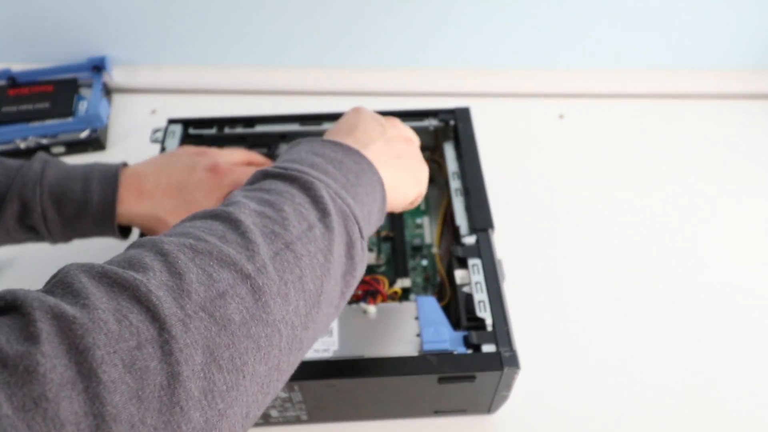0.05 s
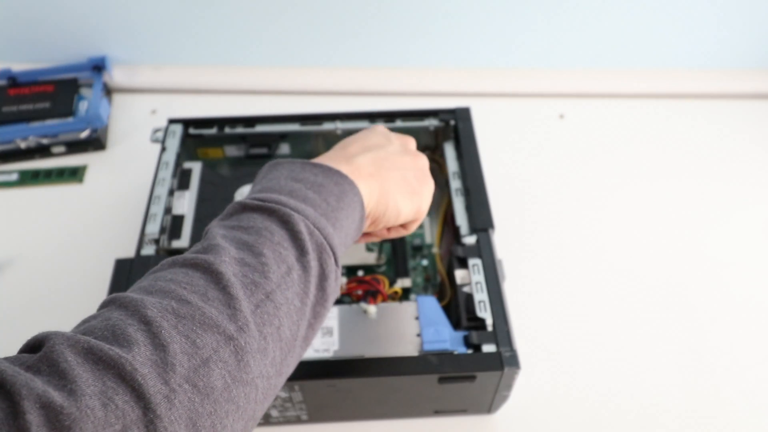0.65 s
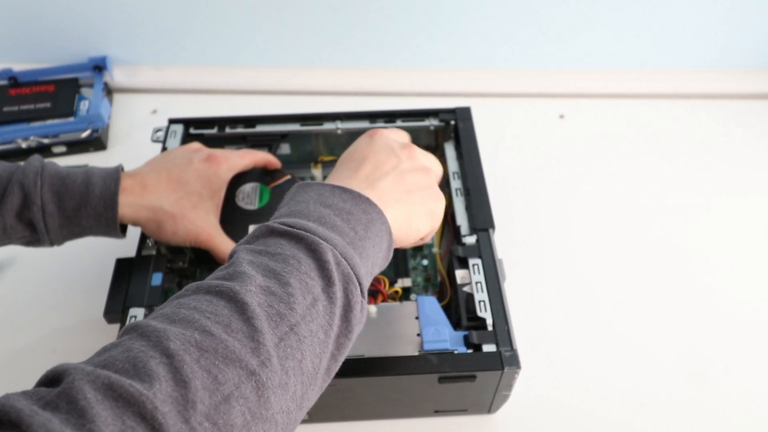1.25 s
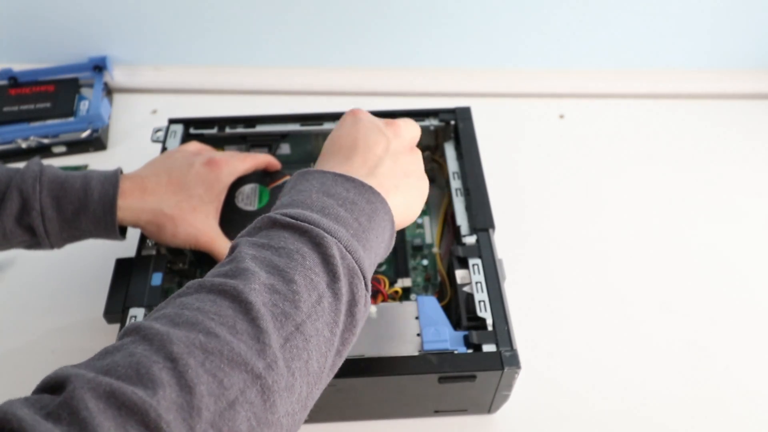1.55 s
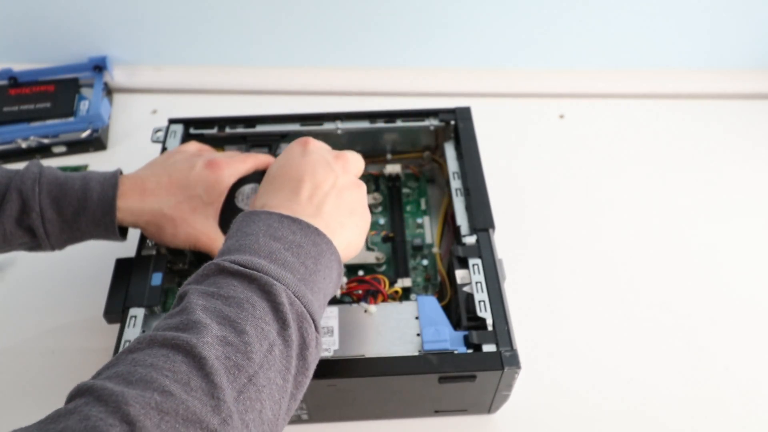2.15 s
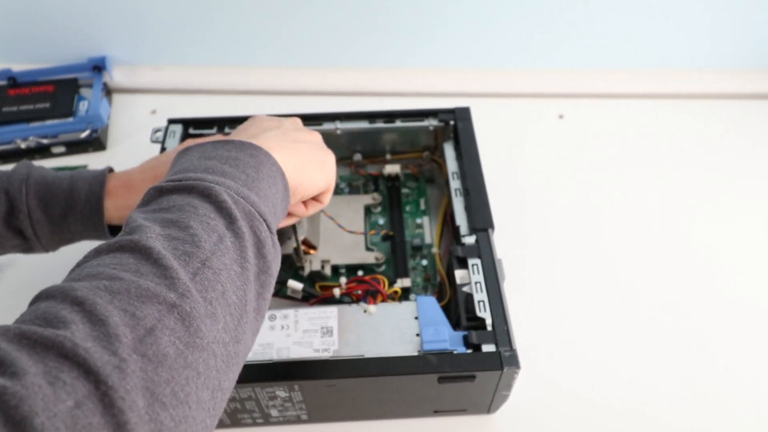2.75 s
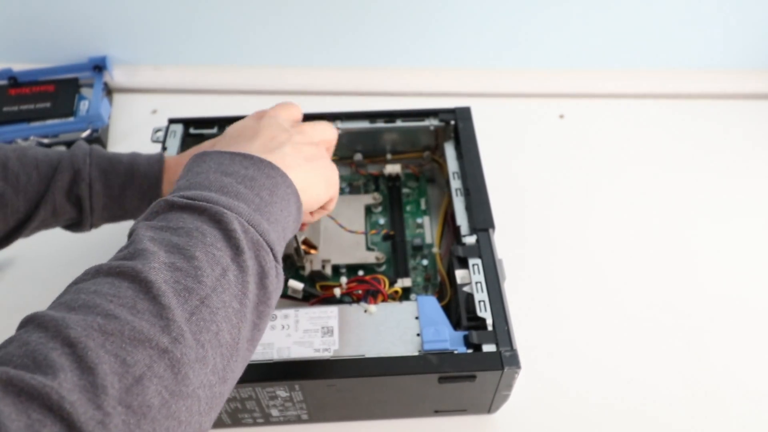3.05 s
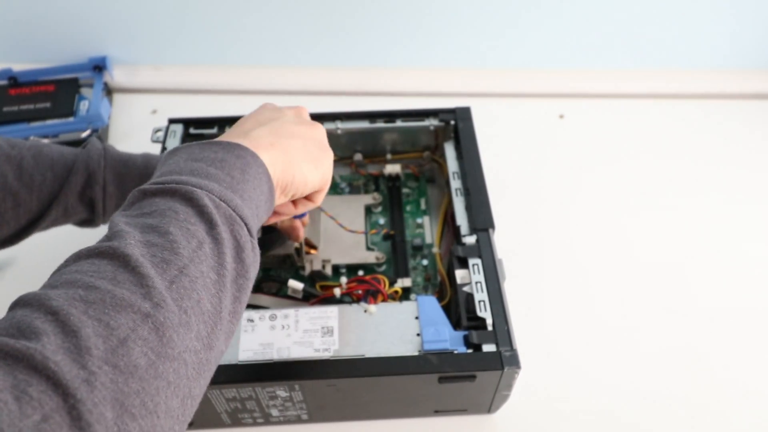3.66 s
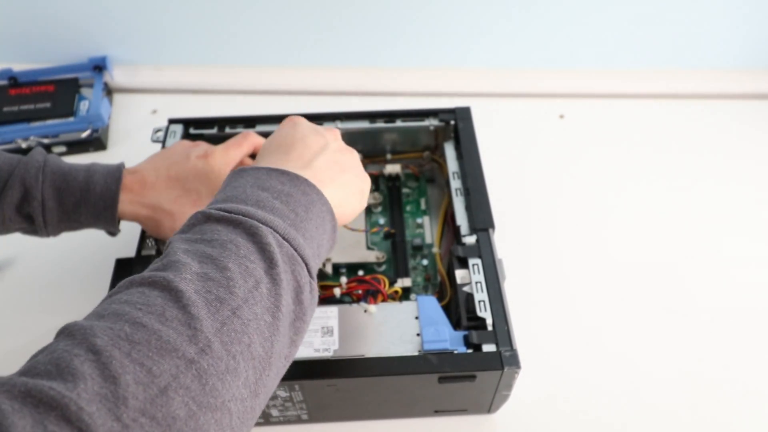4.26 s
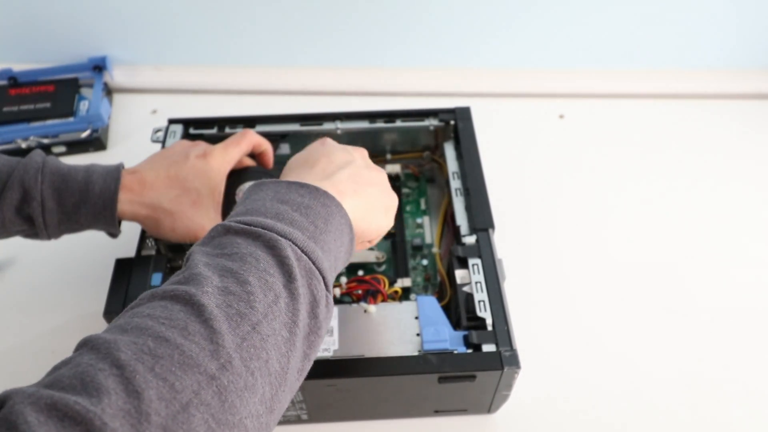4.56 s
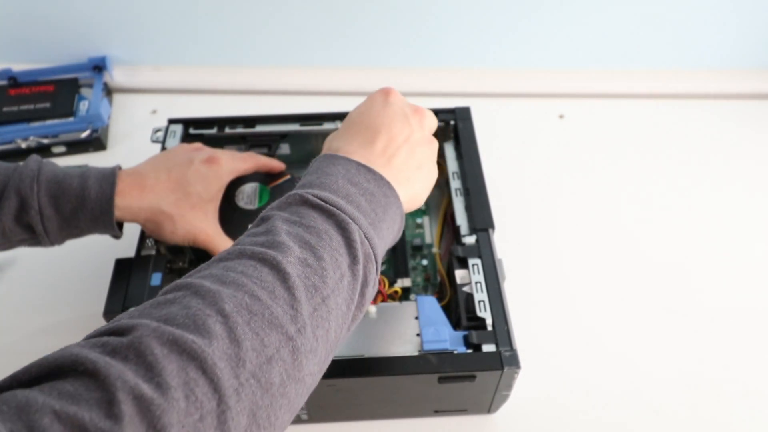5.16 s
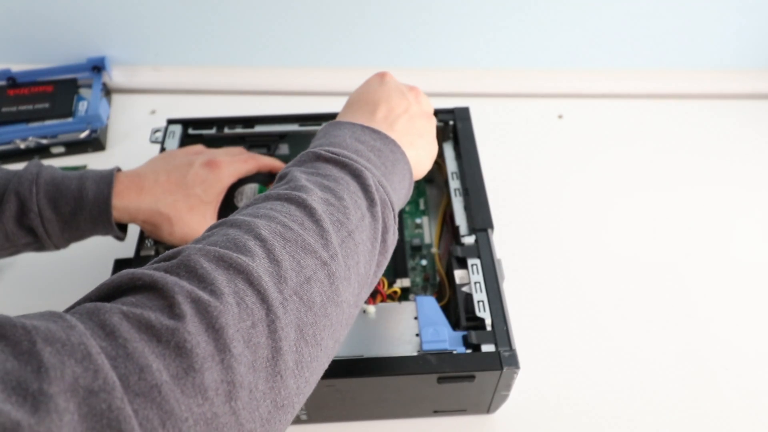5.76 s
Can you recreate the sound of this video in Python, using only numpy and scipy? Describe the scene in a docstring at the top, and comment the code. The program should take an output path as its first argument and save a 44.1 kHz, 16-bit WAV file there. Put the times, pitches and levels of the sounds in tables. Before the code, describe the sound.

A screwdriver works at the cooler screws inside an open desktop computer. Irregular sharp metal clicks and knocks briefly ring the board and steel case, with gritty scrapes and a few faint, thin squeaks between them. After a quieter stretch of light ticks, a loud snap and a short spring twang come near the end. The sound is close, in a small room with soft air and a low hum.

```python
"""A screwdriver knocks and slips in the cooler screws of an open desktop computer, in a small room. Each knock
is a metal crack and a short chatter that rings the board and the steel case. Sprung screws snap free and the
spring twangs; the hardest knocks set the board swinging. Between the knocks, threads and tool stick and slip in
gritty scrapes and thin squeaks, and the tool ticks faintly in the hand. Two close microphones hear it all with
the room's reflections, over soft air and a low mains hum."""
import sys
import numpy as np
from scipy import signal
from scipy.fft import rfft, irfft
from scipy.io import wavfile
from scipy.ndimage import uniform_filter1d

SR = 44100
rng = np.random.default_rng(int(sys.argv[2]) if len(sys.argv) > 2 else 0)


def output_pcm(signal):
    """Save a mono or channel-first signal as 16-bit PCM at the path in sys.argv[1].

    Samples are clipped to [-1, 1] before scaling.
    """
    pcm = np.clip(np.atleast_2d(signal).T, -1, 1) * 32767
    wavfile.write(sys.argv[1], SR, np.round(pcm).astype(np.int16))


N = 255780
FREQ = np.fft.rfftfreq(N, 1 / SR)
TIME = np.arange(N) / SR

# tool or screw hits the case (time [s], level [dB], brightness [dB], contact time [s],
# ring of the struck spot [Hz], ring level [dB]); brightness and ring are relative to the hit
KNOCK_HITS = [(0.006, -42, -13, 0.00096, 1530, -14), (0.127, -41, -10, 0.0033, 2330, 4),
              (0.32, -48, 1.5, 0.00079, 2640, -1), (0.331, -35, -11.5, 0.0009, 2890, -2.5),
              (0.375, -36.5, -17.5, 0.0008, 1500, -6), (0.559, -51.5, -9, 0.0013, 2650, -6),
              (0.823, -37, -11.5, 0.0035, 2720, -11), (0.953, -28.5, -13, 0.0052, 718, -3.5),
              (1.047, -55, -28, 0.0014, 1470, 10), (1.107, -28.5, -19.5, 0.0018, 1140, -28),
              (1.253, -36.5, -16, 0.0074, 1100, 0), (1.2806, -23, -1.5, 0.0024, 1530, -31),
              (1.4368, -22, -9.5, 0.003, 796, -7.5), (1.517, -37, -8, 0.003, 1450, 0),
              (1.69, -54.5, -30, 0.001, 640, 12), (2.2436, -17.5, -4.5, 0.0016, 1734, -1),
              (2.271, -28, -8.5, 0.0008, 561, 4), (2.459, -45.5, -19, 0.00047, 520, -0.5),
              (2.611, -40, -13, 0.0015, 1510, -16), (2.767, -25.5, 7.5, 0.00022, 650, -3.5),
              (2.904, -29.5, -7.5, 0.0012, 1640, -6), (2.955, -38, -22, 0.002, 1420, -22),
              (3.058, -40.5, -11, 0.0015, 2600, -7.5), (3.1308, -30, -15, 0.00043, 810, -5),
              (3.1625, -22.5, 6, 0.0023, 3010, -3), (3.254, -30.5, -22.5, 0.00091, 1455, -13),
              (3.477, -35.5, -32, 0.00046, 1210, -4), (3.64, -27.5, -28.5, 0.002, 1270, -17),
              (3.661, -52, 3.5, 0.0018, 7100, 5.5), (4.064, -42.5, -5.5, 0.0041, 1170, 1.5),
              (4.417, -61.5, -4, 0.0023, 3350, 1), (4.661, -41.5, 3, 0.0039, 696, 3),
              (5.205, -66, 15, 0.00085, 8000, -10), (5.222, -47, -31, 0.0022, 765, 12),
              (5.2345, -18.5, -1.5, 0.0047, 736, -5.5), (5.4946, -26.5, 1.5, 0.0034, 1920, -6),
              (5.609, -37, -3, 0.0011, 1510, -2.5)]
# bands of a contact sound, thud to sizzle (centre [Hz])
CONTACT_BANDS = [260, 670, 1500, 3150, 6700, 12600]
# decay of a knock's chatter (frequency [Hz], t60 [s])
CHATTER_DECAY = [(250, 0.43), (700, 0.14), (1500, 0.075), (3200, 0.06), (7000, 0.058), (13000, 0.042)]
# resonances of board, case and tool (frequency [Hz], width [Hz], level against the bare contact [dB])
CASE_MODES = [(470, 7.5, -56), (536, 41, 3), (650, 87, -6), (794, 23, 14.5), (962, 80, 4.5), (1115, 13, 11),
              (1277, 240, 6.5), (1440, 140, 3), (1502, 170, -0.5), (1725, 23, -3), (2120, 53, -23),
              (2460, 57, 17), (2666, 134, 19.5), (2908, 270, 13.5), (3230, 61, -3), (3430, 120, 5),
              (4070, 27, 4.5), (6950, 370, -42), (8700, 250, -6)]
# the spring under a screw head lets go (time [s], level [dB])
SPRING_TWANGS = [(5.497, -20.5), (5.579, -33.5), (5.61, -40)]
# ring of that spring (frequency [Hz], relative level [dB], t60 [s])
SPRING_MODES = [(1758, -3.5, 0.12), (1870, -8, 0.16), (2260, 2.5, 0.04), (3580, -9.5, 0.12),
                (4210, 6.5, 0.046)]
# a hard knock sets the board swinging (time [s], level [dB], tilt of its modes [dB/octave])
BOARD_SWINGS = [(2.246, -27.5, 5), (2.772, -29.5, 10), (5.238, -22.5, -6.5)]
# ring of the board (frequency [Hz], relative level [dB], t60 [s])
BOARD_MODES = [(167, -5.5, 0.091), (360.7, 1.5, 0.15), (478.6, -6, 0.46), (493, -5, 0.069), (568, -8, 0.17),
               (609, -5.5, 0.29), (750, -11, 0.072)]
# screw turns, tool slides, rattles (peak time [s], half length [s], level [dB], rubbed spot's ring [Hz])
SCRAPE_STROKES = [(0.078, 0.029, -43.5, 1670), (0.151, 0.011, -34.5, 2580), (0.172, 0.013, -30, 2300),
                  (0.305, 0.055, -56, 7840), (0.779, 0.046, -43.5, 865), (0.886, 0.021, -37.5, 990),
                  (0.955, 0.005, -35, 603), (1.189, 0.035, -41, 1240), (1.336, 0.011, -38.5, 1840),
                  (1.492, 0.035, -35.5, 884), (2.266, 0.0052, -29.5, 530), (2.803, 0.03, -31.5, 1210),
                  (2.862, 0.012, -36, 626), (3.088, 0.015, -43, 1550), (3.2, 0.02, -39, 600),
                  (3.39, 0.02, -40, 1560), (3.534, 0.066, -51.5, 1190), (3.69, 0.03, -48, 1180),
                  (3.777, 0.032, -40, 1190), (3.973, 0.011, -43.5, 1110), (4.014, 0.017, -45, 1140),
                  (4.324, 0.022, -50, 3320), (4.421, 0.13, -60.5, 1150), (4.699, 0.02, -41.5, 1144),
                  (4.925, 0.019, -55, 840), (5.28, 0.028, -35.5, 417), (5.554, 0.03, -39, 1730),
                  (5.582, 0.014, -39, 3580), (5.709, 0.03, -45.5, 1620)]
# a turning screw sings (time [s], length [s], top pitch [Hz], level [dB])
THREAD_SQUEAKS = [(0.155, 0.035, 12900, -45), (0.16, 0.035, 6700, -43), (1.852, 0.06, 12450, -60),
                  (1.905, 0.06, 11050, -68), (1.975, 0.082, 10950, -64), (2.51, 0.08, 11250, -63)]
# stereo image of the direct sound (frequency [Hz], left-right likeness [0-1])
DIRECT_LIKENESS = [(200, 1), (1000, 0.87), (3000, 0.61), (14000, 0.1)]
# stereo image of reverb and air (frequency [Hz], left-right likeness [0-1])
DIFFUSE_LIKENESS = [(30, 0.88), (400, 0.87), (1500, 0.19), (5000, 0.05), (15000, 0.1)]
# reverb time (frequency [Hz], t60 [s])
REVERB_DECAY = [(200, 0.29), (700, 0.39), (2000, 0.51), (7000, 0.36), (14000, 0.28)]
# reverb send (frequency [Hz], gain [dB])
REVERB_SEND = [(200, -4.5), (700, -4), (2000, -8.5), (7000, -8.5), (14000, -11.5)]
# colour of the room air (frequency [Hz], relative level [dB])
AIR_SPECTRUM = [(12, -42), (20, -10.5), (58, -9.5), (91, -10.5), (124, -7.5), (206, -15.5), (237, -6),
                (323, -4), (361, -2), (465, -14), (551, -13.5), (2010, -30.5), (12100, -33.5), (15200, -31),
                (16500, -64)]
# partials of the mains hum (frequency [Hz], level [dB])
HUM_PARTIALS = [(59.5, -62), (119.7, -59.5), (240, -59.5), (300, -60.5), (360, -57)]
# colour of the microphones (frequency [Hz], gain [dB])
MIC_EQ = [(100, 1), (2000, 0), (3300, 2.5), (4200, -5), (4800, -5.5), (5400, -2), (6400, 2.5), (9000, -0.5),
          (11500, 0), (13500, -4), (15000, -8.5), (16200, -15)]


def knocks(hits, ring_q=18, ring_feed_t60=0.022, crack_s=0.0022):
    """Metal cracks on metal and chatters briefly; the treble dies first and the struck spot rings."""
    out, t = np.zeros((2, N)), np.arange(8192) / SR
    for s, db, bright_db, contact_s, spot_hz, spot_db in hits:
        onset = 1 - np.exp(-(t / (0.4 * contact_s)) ** 2)
        after = np.maximum(t - contact_s, 0)
        # a harder hit has more crack up front and less body
        crack = 1 + amp(4 + 0.54 * (db + 6)) * np.exp(-(after / crack_s) ** 2)
        body_db = -4 - 0.2629 * (db + 36.5)
        # a longer contact pushes more bass into the case and dulls the top octave
        thud_db = -20 + 9 * np.log2(contact_s / 0.0026)
        top_db = -8 - 2 * np.log2(contact_s / 0.0035)
        gains = contact_eq(thud_db, body_db, bright_db, top_db)
        chatter = rng.standard_normal(len(t)) * onset * crack
        decays = [amp(-60 * after / curve(CHATTER_DECAY, hz)) for hz in CONTACT_BANDS]
        clack = sum(gain * unit_hit(band(chatter * decays[k], k)) for k, gain in enumerate(gains))
        # the chatter keeps feeding the spot, so its ring is rough
        feed = chatter * amp(-60 * after / ring_feed_t60)
        ring = unit_hit(signal.lfilter(*signal.iirpeak(spot_hz, ring_q, SR), feed))
        right_db = 1.05 + 0.5 * np.log2(spot_hz / 1200)  # higher-ringing spots lie further right
        add(out, s, amp(db - 1) * (clack + amp(spot_db - 1) * ring) * pan(right_db))
    return out


def case_ring(x):
    """The modes of board and case gather the energy of each contact into narrow peaks."""
    response = 1 + sum(amp(db) / (1 + 2j * (FREQ - hz) / width) for hz, width, db in CASE_MODES)
    broad_gain = np.sqrt(uniform_filter1d(abs(response) ** 2, size=5000))
    return irfft(rfft(x) * response / broad_gain, N)


def spring_and_board(spring_rise_s=0.00031, board_rise_s=0.011):
    """A freed spring twangs at once; after a hard knock the heavier board takes a few cycles to swing."""
    out, t = np.zeros((1, N)), np.arange(16384) / SR
    for s, db in SPRING_TWANGS:
        twang = modal_ring(SPRING_MODES, t) * (1 - np.exp(-t / spring_rise_s))
        add(out, s, amp(db) * twang[None])
    for s, db, tilt in BOARD_SWINGS:
        swing = modal_ring(BOARD_MODES, t, tilt) * (1 - np.exp(-t / board_rise_s))
        add(out, s, amp(db) * swing[None])
    return out


def modal_ring(modes, t, db_per_octave=0):
    """A struck part rings as decaying sines of random phase."""
    ring = np.zeros(len(t))
    for hz, db, t60 in modes:
        tilt_db = db_per_octave * np.log2(hz / modes[0][0])
        ring += amp(db + tilt_db - 60 * t / t60) * np.sin(2 * np.pi * (hz * t + rng.random()))
    return unit_hit(ring)


def scrapes(slips_per_s=2600, slip_s=0.0007, ring_db=-4, ring_q=16):
    """Threads and tool stick and slip: a swell of tiny uneven clicks rings the rubbed spot."""
    out, t = np.zeros((2, N)), np.arange(24000) / SR
    for peak_s, half_s, db, spot_hz in SCRAPE_STROKES:
        slipping = rng.random(len(t)) < slips_per_s / SR
        slip_db = 3 * np.minimum(rng.exponential(1, len(t)), 4)
        slips = signal.lfilter([1], [1, -np.exp(-1 / (slip_s * SR))], slipping * amp(slip_db))
        swell = np.exp(-((t - 2 * half_s) / half_s) ** 2 / 2) * np.minimum(2 * t / half_s, 1)
        grit = swell * slips * rng.standard_normal(len(t))
        bright_db = -13 + 4 * np.log2(spot_hz / 1200)  # a higher-ringing spot rubs brighter
        gains = contact_eq(thud_db=-14, body_db=-3, bright_db=bright_db, top_db=-1)
        rub = sum(gain * unit_rms(band(grit, k)) for k, gain in enumerate(gains))
        ring = amp(ring_db) * unit_rms(signal.lfilter(*signal.iirpeak(spot_hz, ring_q, SR), grit))
        level = amp(db - 2) * np.sqrt(np.mean(swell ** 2))
        add(out, peak_s - 2 * half_s, level * (rub + ring) * pan(right_db=1.5))
    return out


def squeaks(sag=0.12, crest=0.35, jitter_depth=0.0044):
    """The thread slips fast enough to sing: a thin, shaky tone that crests, then sags as the turn slows."""
    out = np.zeros((1, N))
    for s, length_s, top_hz, db in THREAD_SQUEAKS:
        jitter = unit_rms(uniform_filter1d(rng.standard_normal(8192), size=60))
        turn = np.arange(int(length_s * SR)) / (length_s * SR)
        hz = top_hz * (1 - sag * (turn - crest) ** 2 + jitter_depth * jitter[:len(turn)])
        tone = np.sin(2 * np.pi * np.cumsum(hz) / SR)
        add(out, s, amp(db) * np.sin(np.pi * turn) * tone[None])
    return out


def tool_ticks(count=8, db=-58, spread_db=10, bright_db=-8, contact_s=0.0012, spot_hz=2120):
    """Faint extra hits at random moments, as the tool shifts in the hand."""
    return [(when * N / SR, db + spread_db * (2 * force - 1), bright_db, contact_s,
             spot_hz * 2 ** (spot - 0.5), 0) for when, force, spot in rng.random((count, 3))]


def close_mics(x, lag_s=0.000019, scatter_s=0.0015):
    """Two close microphones: the case reaches the left slightly earlier, and near reflections differ."""
    scatter = rfft(rng.standard_normal(N) * TIME * np.exp(-TIME / scatter_s))
    scatter /= np.sqrt(np.mean(abs(scatter) ** 2))
    likeness = curve(DIRECT_LIKENESS, FREQ)
    side = np.array([[1], [-1]])
    paths = np.sqrt((1 + likeness) / 2) + side * np.sqrt((1 - likeness) / 2) * scatter
    return irfft(rfft(x) * paths * np.exp(1j * np.pi * side * FREQ * lag_s), N)


def room_reverb(x, first_wall_s=0.013):
    """Dense reflections build up after the first wall and die band by band."""
    hz, t, noise = signal.stft(rng.standard_normal((2, 32768)), SR, nperseg=256)
    hz = hz[:, None]
    t60 = curve(REVERB_DECAY, hz)
    decay = amp(-60 * t / t60) * np.sqrt(np.log(1e6) / (t60 * SR))  # equal energy at any t60
    tail = signal.istft(diffuse(noise, hz) * amp(curve(REVERB_SEND, hz)) * decay, SR, nperseg=256)[1]
    tail *= 1 - np.exp(-(TIME[:tail.shape[1]] / first_wall_s) ** 4)
    return signal.fftconvolve(x, tail, axes=1)[:, :N]


def room_air(db=-48):
    """A steady bed of dark, diffuse noise."""
    noise = diffuse(rfft(rng.standard_normal((2, N))), FREQ)
    return amp(db) * unit_rms(irfft(noise * amp(curve(AIR_SPECTRUM, FREQ)), N))


def mains_hum(waver=0.63, drift_hz=6):
    """A low mains hum, each partial wavering in level and phase."""
    hum = np.zeros(N)
    for hz, db in HUM_PARTIALS:
        slow_noise = rfft(rng.standard_normal((2, N))) * np.exp(-(FREQ / drift_hz) ** 2)
        level_drift, phase_drift = waver * unit_rms(irfft(slow_noise, N))
        hum += amp(db) * unit_rms((1 + level_drift) * np.sin(2 * np.pi * hz * TIME + phase_drift))
    return hum


def diffuse(spectra, hz):
    """Blends two unrelated spectra until they are as alike as room sound at the two microphones."""
    likeness = curve(DIFFUSE_LIKENESS, hz)
    return np.array([spectra[0], likeness * spectra[0] + np.sqrt(1 - likeness ** 2) * spectra[1]])


def contact_eq(thud_db, body_db, bright_db, top_db):
    """Six band gains of a contact; brightness moves the upper three."""
    return amp([thud_db, body_db, 0, 0.36 * bright_db, bright_db, top_db + bright_db])


def band(x, index):
    """One of the six contact bands of x."""
    edges_hz = [150, 450, 1000, 2200, 4500, 10000, 16000]
    return signal.sosfilt(signal.butter(3, edges_hz[index:index + 2], "band", fs=SR, output="sos"), x)


def amp(db):
    """Decibels to gain."""
    return 10 ** (np.asarray(db) / 20)


def pan(right_db):
    """Stereo gains with the right louder by right_db."""
    return amp([[-right_db / 2], [right_db / 2]])


def unit_rms(x):
    """Scales to rms 1."""
    return x / np.sqrt(np.mean(x ** 2) + 1e-20)


def unit_hit(x):
    """Gives a hit the energy of 15 ms at rms 1."""
    return x / np.sqrt(np.sum(x ** 2) / (0.015 * SR) + 1e-20)


def curve(points, hz):
    """Reads (frequency [Hz], value) points on a log-frequency axis."""
    f, value = np.transpose(points)
    return np.interp(np.log(hz + 1), np.log(f + 1), value)


def add(mix, s, sound):
    """Lays a sound into the mix at time s."""
    part = mix[:, max(round(s * SR), 0):][:, :sound.shape[1]]
    part += sound[:, :part.shape[1]]


def scene():
    """The case radiates differently in three directions: one meets the microphones, all fill the room."""
    hits = KNOCK_HITS + tool_ticks()
    directions = [case_ring(knocks(hits) + scrapes()) + spring_and_board() + squeaks() for _ in range(3)]
    reverb = sum(room_reverb(sound) for sound in directions) / np.sqrt(len(directions))
    return close_mics(directions[0]) + reverb + room_air() + mains_hum()


def record(dry):
    """Microphone colour, a clip at full scale, then a steep low-pass."""
    coloured = irfft(rfft(dry) * amp(curve(MIC_EQ, FREQ)), N)
    low_pass = signal.firwin(401, cutoff=16150, window=("kaiser", 9), fs=SR)
    return signal.oaconvolve(np.clip(coloured, -1, 1), low_pass[None], "same", axes=1)


dry = scene()
out = record(dry)
output_pcm(out)
```